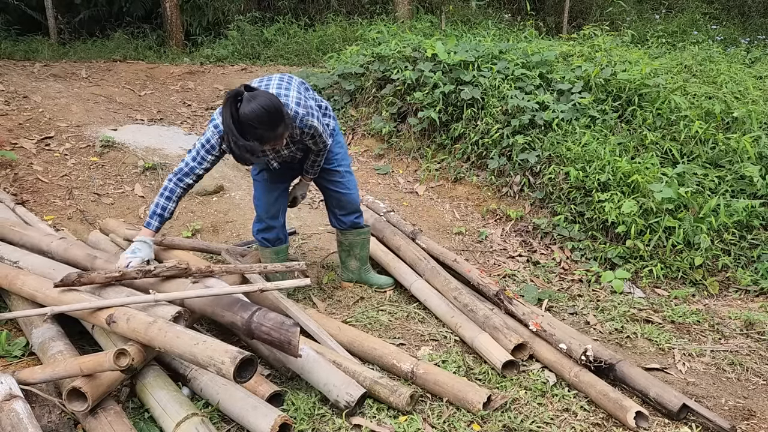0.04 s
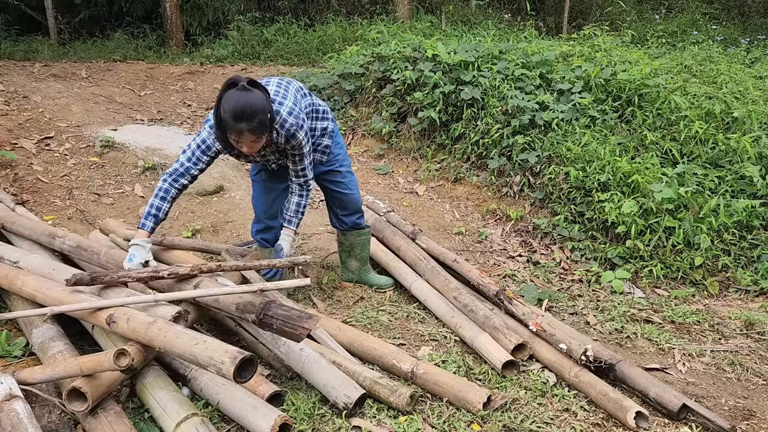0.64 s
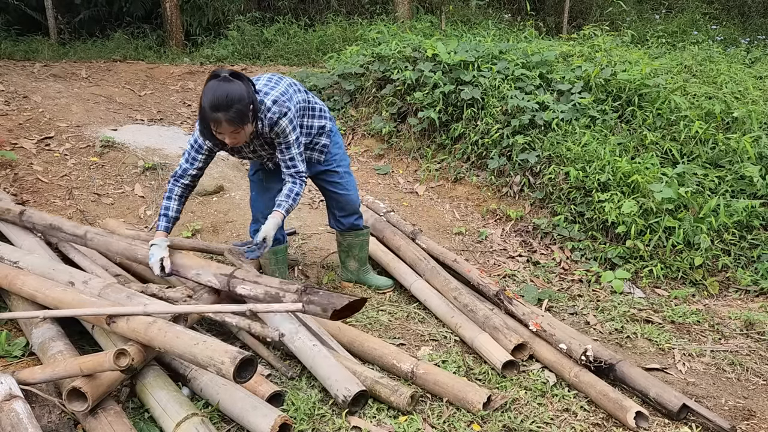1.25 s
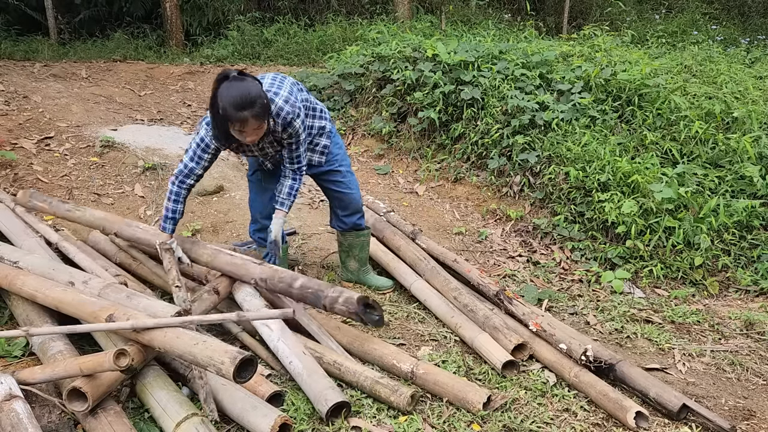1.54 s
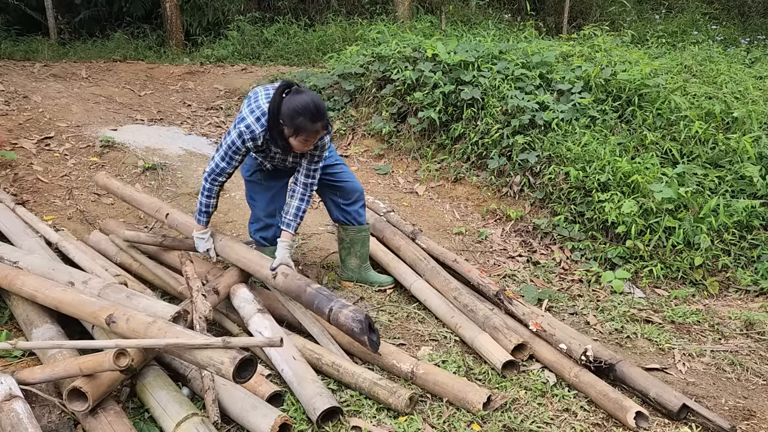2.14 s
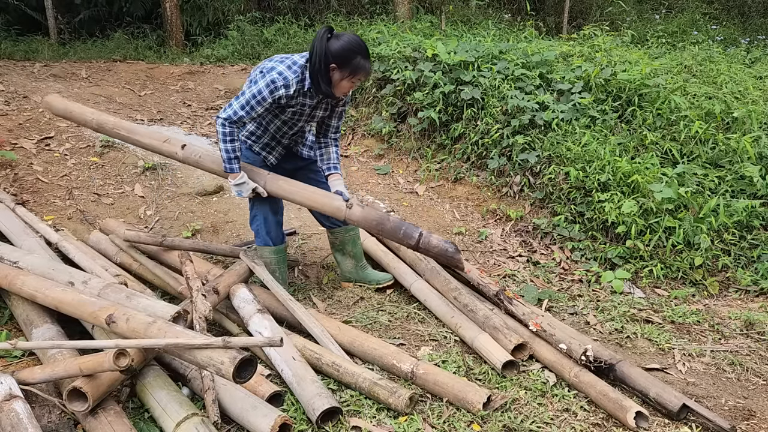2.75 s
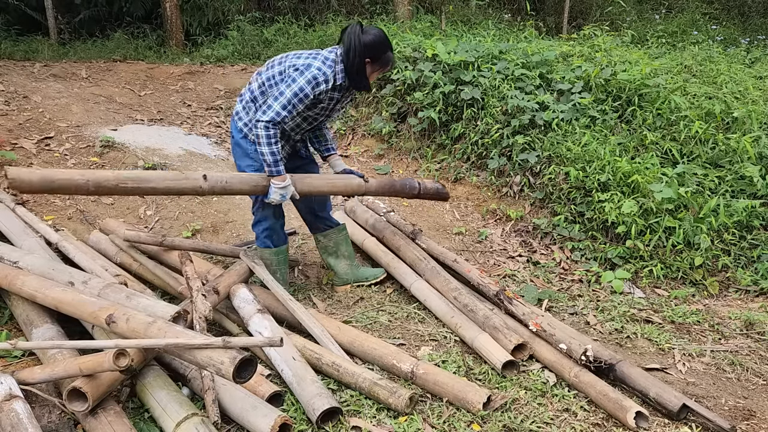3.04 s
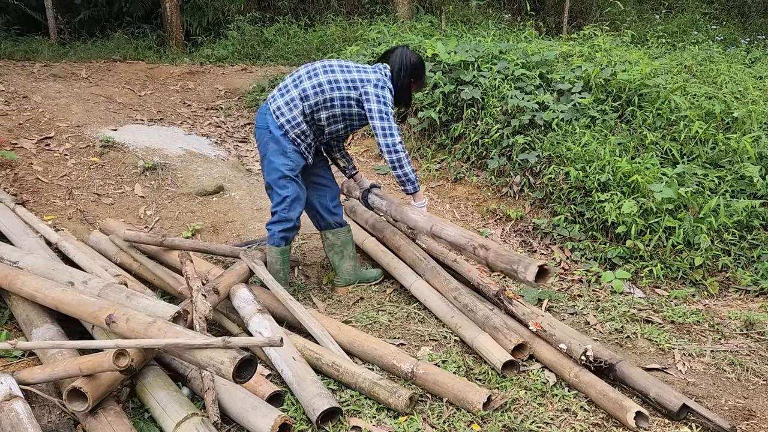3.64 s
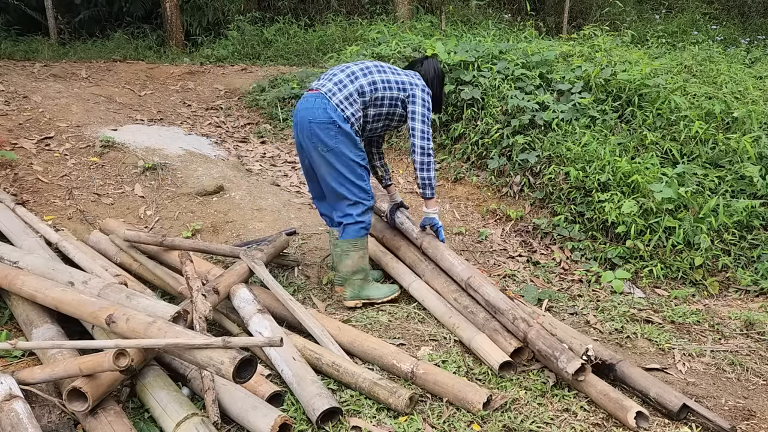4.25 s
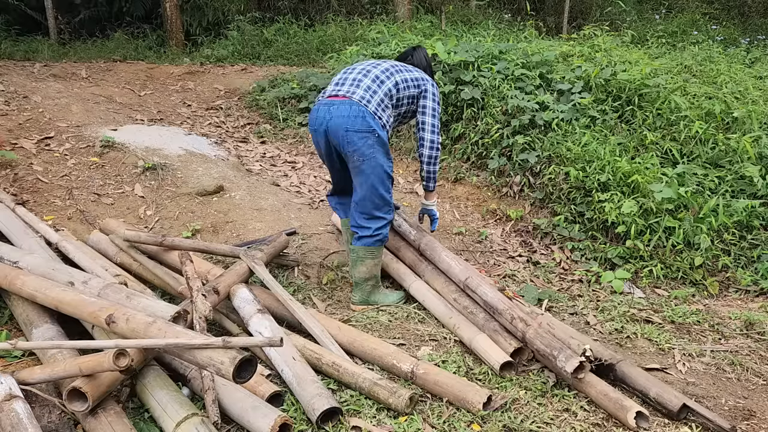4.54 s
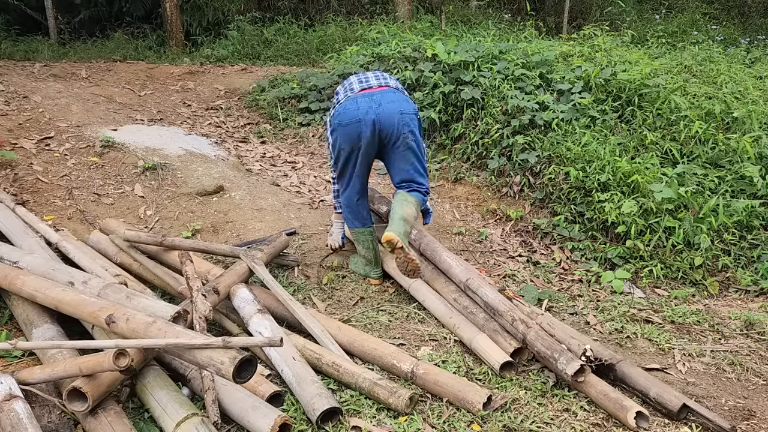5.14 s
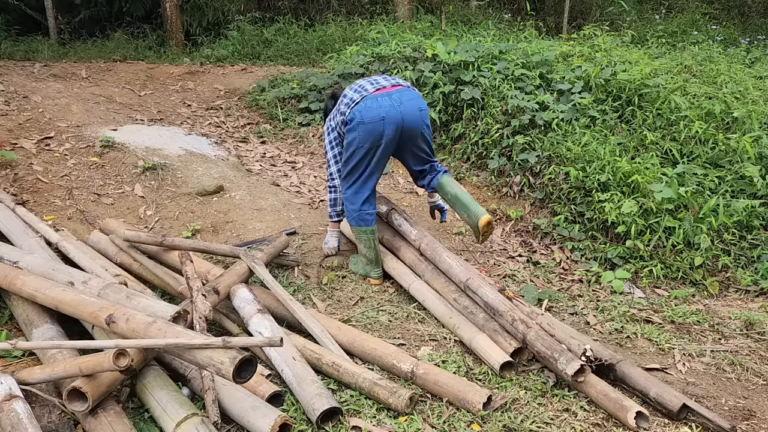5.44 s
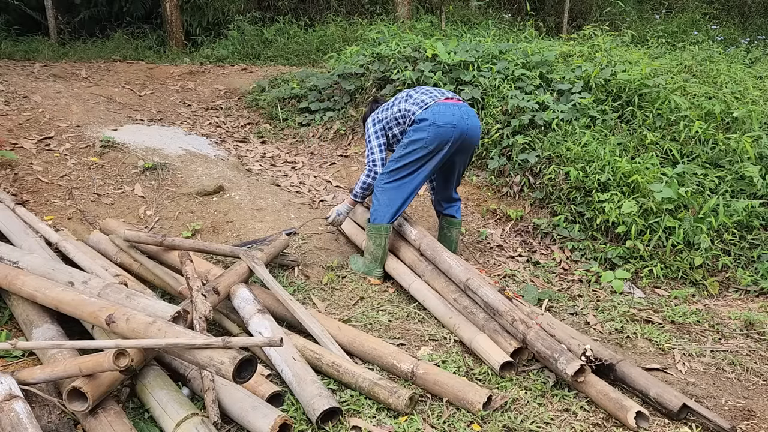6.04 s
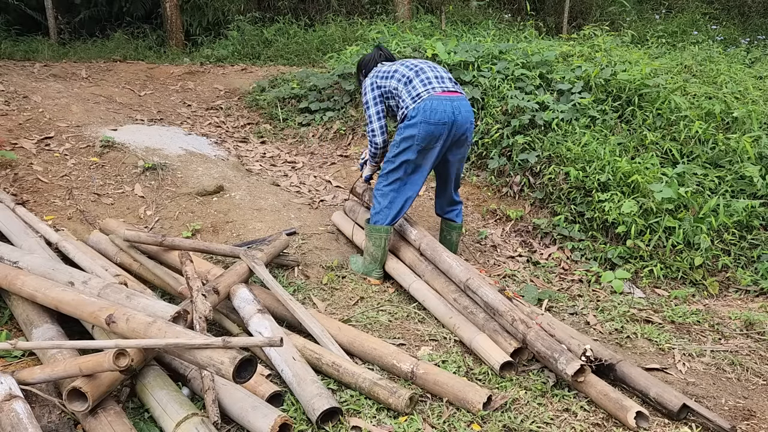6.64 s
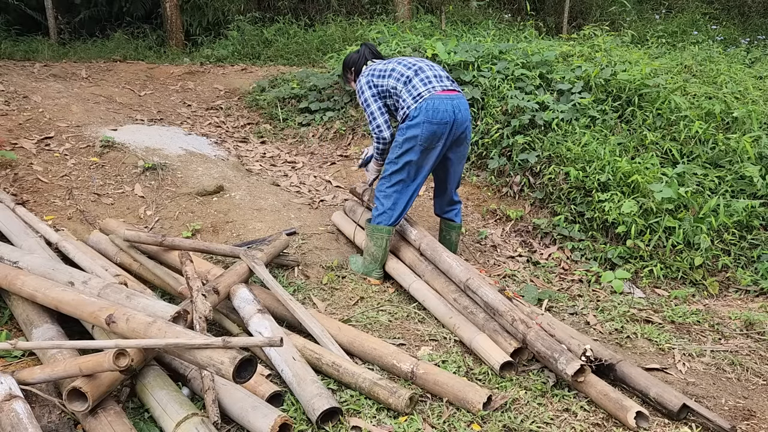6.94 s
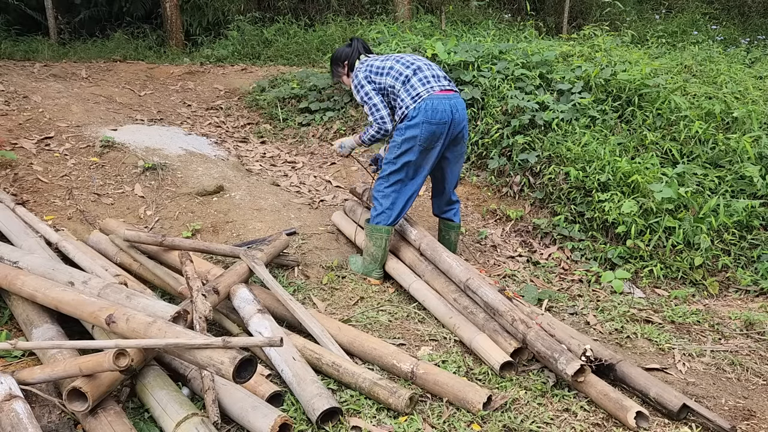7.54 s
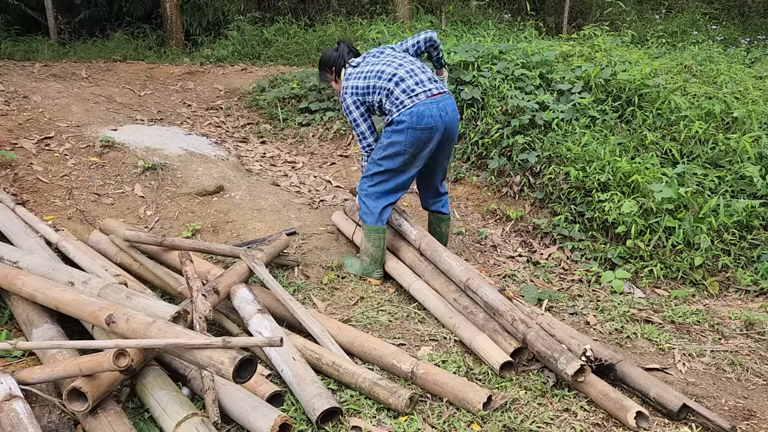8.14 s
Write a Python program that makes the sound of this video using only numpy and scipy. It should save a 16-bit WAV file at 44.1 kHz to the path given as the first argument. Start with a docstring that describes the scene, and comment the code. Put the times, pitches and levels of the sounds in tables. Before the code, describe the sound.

A light, hollow bamboo knock sounds at about 0.4 seconds, followed by a faint scrape. From 1 to 2.1 seconds a pole is dragged off the pile nearby: loud, dry clattering in three quick clusters, with rasping, tiny splinter cracks and low bumps on the ground. A lull follows, with dry leaves rustling, a soft boot step near 3.1 seconds and a very faint, high insect trill between 2 and 4 seconds. At 4.2 seconds the pole drops on another stack with a short, loud clatter and scrape. Boots thud softly and scuff through leaves around 4.7 and 5.7 seconds. Small clacks come between 6.1 and 6.8 seconds, the clearest at 6.5. Faint ticks, a light scrape and a last step fill 7.5 to 8.3 seconds, as a distant low engine hum gently swells and eases. Foliage hisses quietly throughout, with little echo in the open air.

```python
"""A dry bamboo pole is dragged off a clattering pile, carried over and dropped on a second stack.
Each knock bends a pole and rings its hollow tube; sliding poles rasp and judder, and splinters snap.
Rubber boots tread on earth and leaves, and the stack is nudged into place with small clacks and scrapes.
Behind it, outdoors, an insect shrills faintly, a far engine hums low and the foliage hisses."""
import sys
import numpy as np
from scipy import signal
from scipy.fft import rfft, irfft, next_fast_len
from scipy.io import wavfile
from scipy.ndimage import map_coordinates

SR = 44100
rng = np.random.default_rng(int(sys.argv[2]) if len(sys.argv) > 2 else 0)


def master(y):
    """Save y as 16-bit WAV."""
    cut = np.clip(np.atleast_2d(y).T, -1, 1)
    pcm = np.round(cut * 32767)  # scale
    wavfile.write(sys.argv[1], SR, pcm.astype(np.int16))


N = 365148
TIME = np.arange(N) / SR
HIT = TIME[:SR // 3]  # time axis of a one-shot


# pole on pole: t/s, relative level/dB, hardness/dB, bending f/Hz, main tube ring f/Hz
POLE_KNOCKS = [(0.277, -50, -9, 298, 833), (0.289, -48.5, -17.5, 254, 700), (0.404, -31.5, 3, 257, 545),
               (1.134, -47, -6, 228, 1000), (1.2199, -24.5, 6.5, 285, 563), (1.2504, -18.5, -3.5, 348, 513),
               (1.2559, -21.5, 9.5, 326, 570), (1.292, -23, -3.5, 357, 873), (1.305, -20.5, 5, 280, 550),
               (1.341, -41, -10, 298, 544), (1.412, -36, -3.5, 329, 515), (1.595, -47, 5, 300, 535),
               (1.672, -22.5, -2, 263, 648), (1.713, -18.5, 9, 275, 505), (1.73, -23.5, -3, 226, 480),
               (1.75, -25, 1.5, 340, 512), (1.801, -42.5, -9, 217, 570), (1.935, -39.5, 1, 257, 780),
               (1.953, -28, 5.5, 403, 890), (1.968, -18.5, 2, 350, 844), (2.009, -31, -3, 292, 720),
               (4.2322, -18.5, 1, 442, 490), (4.2556, -16, 2.5, 372, 620), (4.2641, -25, 8.5, 335, 562),
               (4.297, -24.5, 4.5, 370, 556), (4.3401, -35.5, -7, 212, 926), (4.363, -27, 2, 263, 562),
               (4.37, -24.5, 3, 288, 583), (6.131, -51, 2.5, 330, 795), (6.518, -35, 8, 354, 1036),
               (6.825, -51, 12, 295, 1013), (7.498, -62.5, 17, 196, 1096), (7.857, -54, 10.5, 385, 540),
               (7.929, -54, 11, 385, 855), (8.07, -55.5, 17, 420, 1094)]
# the pile's weight on the ground: t/s, f/Hz, relative level/dB
GROUND_BUMPS = [(1.306, 121, -33), (1.722, 83, -29), (1.765, 120, -34), (1.945, 127, -30), (1.978, 98, -30),
                (4.238, 100, -26), (4.267, 175.4, -26.5), (4.361, 107, -38)]
def knocks(rebound_s=0.014, trim_db=-0.27):
    """Poles strike and rebound, and the ground takes their weight with a low bump."""
    out = np.zeros(N)
    for s, db, hardness_db, bend_hz, ring_hz in POLE_KNOCKS:
        add(out, s, blow(db, hardness_db, bend_hz, ring_hz))
        bounce_s = s + rebound_s * rng.uniform(0.8, 1.2)
        # the rebound is quieter, softer and lower
        add(out, bounce_s, blow(db - 14, hardness_db - 4.5, bend_hz * 0.85, ring_hz))
    for s, hz, db in GROUND_BUMPS:
        add(out, s, from_db(db) * swing(hz, t60=0.19, rise_t60=0.011))
    return from_db(trim_db) * out


# the tube's clear modes: f/Hz, relative level/dB, t60/s
TUBE_MODES = [(491.5, 4, 0.034), (514, -9.5, .08), (561, -3.5, 0.13), (615, -12.5, .1), (745.6, -7, 0.12),
              (831, -6.5, 0.081), (950, -3, 0.079), (1047, 1, 0.058), (1075, -6.5, 0.018),
              (1350, -3.5, 0.072), (1446, 0, 0.078), (1485, 12.5, 0.026), (1650, -8, 0.046),
              (1850, -6, 0.026), (2075, -5, 0.075), (2230, -14, .06), (2561, -18, .05)]
def tube_ring(detune_spread=0.013):
    """The tube's modes ring out, varied because each pole and each striking spot differs."""
    hz, db, t60 = np.transpose(TUBE_MODES)[:, :, None]
    strength, detune = rng.standard_normal((2, len(TUBE_MODES), 1))
    sign = rng.choice([-1, 1], (len(TUBE_MODES), 1))
    partials = np.sin(2 * np.pi * hz * (1 + detune_spread * detune) * HIT)
    ring = np.sum(sign * from_db(db + 2 * strength) * fade(HIT, t60) * partials, axis=0)
    return ring * (1 - fade(HIT, 0.0067))


# the wall's many close, damped modes: f/Hz, relative level/dB
WALL_EQ = [(100, -11), (210, 1), (450, 6), (900, 0.5), (1550, -2.5), (1900, -15.5), (2600, -11.5),
           (3400, -24), (4500, -33), (8000, -45.5), (15000, -46.5)]
# body, hollow, clack, tick: low f/Hz, high f/Hz, noise t60/s, relative level/dB, hardness slope/(dB/dB)
KNOCK_LAYERS = [(127.7, 358, 0.13, 3, -1.0), (465, 1150, 0.042, 1.97, 0.0562),
                (1102, 3600, 0.017, -5.5, 1.01), (2604, 6000, 0.025, -16.5, 1.06)]
def blow(db, hardness_db, bend_hz, ring_hz):
    """One contact bends the pole and rings tube and wall; a harder one trades body for clack and tick."""
    tube = tube_ring()
    wall = colour(rng.standard_normal(len(HIT)), WALL_EQ) * (1 - fade(HIT, .009))
    thud, wall_hollow, wall_clack, tick = [
        unit_hit(band(wall * fade(HIT, t60), low, high)) for low, high, t60, *_ in KNOCK_LAYERS]
    tube_hollow, tube_clack = [unit_hit(band(tube, low, high)) for low, high, *_ in KNOCK_LAYERS[1:-1]]
    body = swing(bend_hz, t60=0.074, rise_t60=0.0077) + from_db(-0.5) * thud
    note = swing(ring_hz, t60=0.062, rise_t60=0.023)
    hollow = from_db(1) * note + tube_hollow + from_db(-1.5) * wall_hollow
    layers = [body, hollow, tube_clack + wall_clack, tick]
    return sum(from_db(db + layer_db + slope * hardness_db) * unit_hit(layer)
               for (*_, layer_db, slope), layer in zip(KNOCK_LAYERS, layers))


def nudge(s=6.677, hz=588, db=-45, t60=0.11):
    """A light nudge rings only the hollow of a tube: a soft note with neither thud nor clack."""
    out = np.zeros(N)
    hollow = unit_hit(band(rng.standard_normal(len(HIT)) * fade(HIT, t60), 466, 740))
    add(out, s, from_db(db) * unit_hit(swing(hz, t60, rise_t60=0.018) + hollow))
    return out


# splinters snapping: t/s, level/dB
SPLINTER_SNAPS = [(1.2223, -33), (1.411, -46.5), (1.7134, -47), (1.968, -48), (4.2553, -38.5),
                  (4.342, -31.5), (6.521, -46), (6.54, -40), (6.827, -51.5)]
# their bright tone: f/Hz, relative level/dB
SPLINTER_EQ = [(1000, -13), (2000, -2), (3500, 4.5), (6000, -8.5), (10000, -11), (15000, -18.5)]
def splinters(t60=0.0049):
    """Dry fibres let go in a very short, bright crack."""
    out = np.zeros(N)
    for s, db in SPLINTER_SNAPS:
        crack = colour(rng.standard_normal(len(HIT)), SPLINTER_EQ) * fade(HIT, t60)
        add(out, s, from_db(db) * unit_hit(crack))
    return out


# poles, and once a glove, sliding on poles: start t/s, length/s, judder level/dB, rasp level/dB
SLIDES = [(0.42, 0.43, -56, -59.5), (1.003, 0.34, -51, -44.5), (1.258, 0.41, -43, -51.5),
          (1.69, 0.443, -43.5, -72), (2.924, 0.24, -56, -66), (3.952, 0.4, -58.5, -57),
          (4.301, 0.17, -44, -54), (7.606, 0.666, -72, -54)]
# resonances of the scraped tube: f/Hz, relative level/dB
RASP_EQ = [(300, -12.5), (450, -6), (560, 2.5), (680, -8), (1030, -1.5), (1280, -2.5), (1470, -1),
           (1680, -7.5), (2300, -6), (3600, -9), (6000, -20), (12000, -29)]
def slides(squeal_hz=1480, squeal_db=-9, hollow_db=-9):
    """Tiny slips rasp in the tube and a squeal comes and goes, while the pole judders hollowly."""
    slips = grains(per_s=3000, spread_db=2.0)
    squeal = rms_one(band(slips, squeal_hz * .93, squeal_hz * 1.07) * from_db(4 * drift(16)))
    scrape = colour(slips, RASP_EQ) * from_db(2.6 * drift(45))
    rasp = rms_one(scrape + from_db(squeal_db) * squeal)
    catches = grains(per_s=330, spread_db=1.0)
    body, hollow = rms_one(band(catches, 150, 380)), rms_one(band(catches, 490, 620))
    judder = rms_one(body + from_db(hollow_db) * hollow)
    return sum(stroke(s, length_s, attack_s=0.15, release_s=0.12)
               * (from_db(judder_db) * judder + from_db(rasp_db) * rasp)
               for s, length_s, judder_db, rasp_db in SLIDES)


# boots on earth: t/s, thud f/Hz, thud level/dB, scuff level/dB
BOOT_STEPS = [(3.118, 201, -49, -56), (4.681, 270, -42.5, -62), (4.705, 201, -43.5, -67.5),
              (5.725, 235, -34, -43.5), (8.22, 225.7, -42, -74)]
# scuff of a rubber sole: f/Hz, relative level/dB
SOLE_EQ = [(200, -14), (500, -27), (900, 1), (1500, 2.5), (2200, -7), (4000, -12), (8000, -12.5),
           (15000, -34)]
def steps():
    """Boots land with a dull thud, and the sole scuffs the earth a moment later."""
    out = np.zeros(N)
    for s, hz, thud_db, scuff_db in BOOT_STEPS:
        earth, sole = rng.standard_normal((2, len(HIT)))
        soil = unit_hit(band(earth * fade(HIT, 0.088), 132, 257))
        thud = swing(hz, t60=0.027, rise_t60=.015) + from_db(3.5) * soil
        scuff = colour(sole, SOLE_EQ) * fade(HIT, 0.076) * (1 - fade(HIT, 0.024)) ** 2
        add(out, s, from_db(thud_db) * unit_hit(thud) + from_db(scuff_db) * unit_hit(scuff))
    return out


# boots, gloves and poles brush dry leaves: peak t/s, half length/s, relative crunch/dB, relative crisp/dB
LEAF_BRUSHES = [(0.802, 0.026, -50, -69), (1.137, 0.13, -50, -63), (1.278, 0.025, -51, -50),
                (1.593, 0.27, -55.5, -61.5), (2.012, 0.13, -54, -63), (3.059, 0.11, -53.5, -64.5),
                (4.18, 0.12, -53, -62), (4.263, 0.024, -50, -49.5), (4.455, 0.033, -57, -61),
                (4.67, 0.098, -57, -67), (4.78, 0.031, -51.5, -62), (5.062, 0.064, -57.5, -68),
                (5.22, 0.042, -68, -66), (6.14, 0.062, -59, -69.5), (6.31, 0.031, -49, -53.5)]
# upper-mid crunch of the leaves: f/Hz, relative level/dB
CRUNCH_EQ = [(400, -4.5), (1500, 3.5), (3000, 1), (5000, 0), (7000, -13.5), (10000, -22), (15000, -27.5)]
def rustle(knocking, shake_db=-27, settle_s=0.02):
    """Each brush or knock stirs the leaves into a cloud of tiny crackles, with a few stalks snapping."""
    # knocks shake the leaves in proportion to their strength
    hold = np.exp(-1 / (settle_s * SR))
    shake = signal.lfilter([1 - hold], [1, -hold], np.abs(knocking) + 1e-18)
    crunch_gain, crisp_gain = from_db(shake_db) * shake, np.zeros(N)
    for s, half_s, crunch_db, crisp_db in LEAF_BRUSHES:
        swell = np.exp(-((TIME - s) / half_s) ** 2)
        crunch_gain += from_db(crunch_db) * swell
        crisp_gain += from_db(crisp_db) * swell
    leaves = np.array([grains(per_s=5200, spread_db=2) for ear in range(2)]) * from_db(1.2 * drift(70))
    snap = rng.standard_normal((2, len(HIT))) * fade(HIT, 0.0037)
    stalks = rms_one(signal.fftconvolve(grains(per_s=34, spread_db=2.0)[None], snap, axes=1)[:, :N])
    crackle = rms_one(leaves + .52 * stalks)
    crunch, crisp = colour(crackle, CRUNCH_EQ), rms_one(band(crackle, 5000, 14000))
    return from_db(-3.0) * crunch_gain * crunch + from_db(0.9) * crisp_gain * crisp


# where the poles touch: t/s, left ear lead/ms, left minus right level/dB
PAN_PATH = [(0, 0.094, 1.5), (2.2, 0.18, 0), (4.2, 0.12, 0.3), (8.198, -.02, 1)]
def place(x):
    """The nearer ear hears the work sooner and louder."""
    s, lead_ms, pan_db = np.transpose(PAN_PATH)
    half_lead = np.interp(TIME, s, lead_ms) * SR / 2000
    half_pan_db = np.interp(TIME, s, pan_db) / 2
    return np.array([map_coordinates(x, [np.arange(N) + side * half_lead], order=3)
                     * from_db(side * half_pan_db) for side in (1, -1)])


def clearing(x, scatter_db=-9.5, scatter_t60=0.054, tail_db=-13, tail_t60=0.39):
    """Nearby poles and ground scatter the sound at once; bank and trees return a faint, dull tail."""
    t = TIME[:SR]
    scatter_decay, tail_decay = fade(t, scatter_t60), fade(t, tail_t60)
    scatter = band(diffuse(len(t)), 870, 15000) * scatter_decay * (t > .001)
    tail = band(diffuse(len(t)), 150, 2520) * tail_decay * (1 - fade(t, 0.36))
    response = (from_db(scatter_db) * scatter / np.linalg.norm(scatter_decay)
                + from_db(tail_db) * tail / np.linalg.norm(tail_decay))
    return signal.fftconvolve(x[None], response, axes=1)[:, :N]


# the insect's bursts: start t/s, length/s, level/dB
INSECT_TRILLS = [(2.069, 0.42, -72.5), (2.89, 0.34, -61), (3.42, 0.63, -72.5)]
def insect(flutter_db=2.5):
    """A thin, very high, fluttering trill from the bushes."""
    gain = sum(from_db(db) * stroke(s, length_s, attack_s=0.14, release_s=0.13)
               for s, length_s, db in INSECT_TRILLS)
    shrill = band(rng.standard_normal((2, N)), 11750, 12650)
    return gain * rms_one(shrill * from_db(flutter_db * drift(40)))


def engine(hz=96, waver=0.028, flutter_db=3.0, peak_db=-52, peak_s=7.45, half_power_s=0.85):
    """A far engine: one wavering firing tone in a narrow rumble, slowly swelling and receding."""
    firing_hz = hz * (1 + waver * drift(13))
    tone = np.sin(2 * np.pi * np.cumsum(firing_hz) / SR) * from_db(flutter_db * drift(12))
    rumble = rms_one(band(rng.standard_normal(N), 84, 108))
    swell = from_db(peak_db) / np.hypot(1, (TIME - peak_s) / half_power_s)
    return swell * rms_one(tone + 0.1 * rumble)


# outdoor bed: f/Hz, relative level/dB
AIR_EQ = [(15, -32.5), (24, -1.5), (31, -13.5), (50, -3.5), (80, -5.5), (110, -11.5), (140, -19.5),
          (200, -24.5), (300, -28.5), (470, -30.5), (600, -24.5), (800, -27), (1200, -26.5), (2300, -24.5),
          (3800, -30.5), (5100, -27.5), (6500, -33.5), (8000, -32), (11000, -40.5), (13000, -43.5),
          (15800, -43)]
def air(db=-54):
    """Foliage hisses steadily all around, over a low rumble."""
    return from_db(db) * colour(diffuse(N), AIR_EQ)


# stereo image of diffuse sound: f/Hz, left-right correlation
EAR_LIKENESS = [(60, 1), (130, 0.93), (290, 0.83), (640, 0.16), (1400, -.35), (3000, 0.15), (15000, -0.19)]
def diffuse(size):
    """Stereo noise from all around: alike in the bass, wide in the treble."""
    padded = next_fast_len(size)
    alike = np.clip(at_hz(EAR_LIKENESS, np.fft.rfftfreq(padded, 1 / SR)), -1, 1)
    mid, side = rfft(rng.standard_normal((2, padded)))
    return irfft(np.sqrt(1 + alike) * mid + np.sqrt(1 - alike) * side * [[1], [-1]], padded)[:, :size]


def swing(hz, t60, rise_t60):
    """One mode that swells during the contact and dies away."""
    return unit_hit(np.sin(2 * np.pi * hz * HIT) * fade(HIT, t60) * (1 - fade(HIT, rise_t60)))


def grains(per_s, spread_db):
    """Random clicks of uneven size."""
    sizes = from_db(spread_db * np.minimum(rng.exponential(1, N), 4)) * rng.choice([-1, 1], N)
    return rms_one(sizes * (rng.random(N) < per_s / SR))


def stroke(start_s, length_s, attack_s, release_s):
    """Rise, hold and fall of one gesture."""
    return np.clip(np.minimum((TIME - start_s) / attack_s, (start_s + length_s - TIME) / release_s), 0, 1)


def drift(per_s):
    """Random modulation with a spread near 1."""
    return np.interp(TIME * per_s, np.arange(2000), rng.standard_normal(2000))


def fade(t, t60):
    """Exponential decay, 60 dB down at t60."""
    return np.exp(-np.log(1000) * t / t60)


def band(x, low_hz, high_hz):
    """Causal band-pass."""
    sos = signal.butter(2, [low_hz, min(high_hz, .45 * SR)], "band", fs=SR, output="sos")
    return signal.sosfilt(sos, x)


def colour(x, eq):
    """Shape a noise with an EQ curve; rms 1."""
    size = next_fast_len(x.shape[-1])
    gain = from_db(at_hz(eq, np.fft.rfftfreq(size, 1 / SR)))
    return rms_one(irfft(rfft(x, size) * gain, size)[..., :x.shape[-1]])


def at_hz(points, hz):
    """Read a curve on a log-frequency axis."""
    points = np.array(points)
    return np.interp(np.log(hz + 1e-3), np.log(points[:, 0]), points[:, 1])


def from_db(db):
    """Decibels to gain."""
    return 10 ** (np.asarray(db) / 20)


def rms_one(x):
    """Scale to unit rms."""
    return x / np.sqrt(np.mean(x ** 2) + 1e-20)


def unit_hit(x):
    """Scale to the energy of 10 ms at unit rms."""
    return x / np.sqrt(np.sum(x ** 2) / (SR / 100) + 1e-20)


def add(out, s, sound):
    """Mix a sound in at time s."""
    start = max(round(s * SR), 0)
    out[start:start + len(sound)] += sound[:N - start]


def scene():
    """Poles and boots in the clearing, over the outdoor background."""
    knocking = knocks()
    work = knocking + nudge() + splinters() + steps() + slides()
    return place(work) + clearing(work) + rustle(knocking) + insect() + engine() + air()


def record(dry, cutoff_hz=15900):
    """A steep high cut on the whole mix."""
    return signal.sosfilt(signal.ellip(10, .1, 80, cutoff_hz, fs=SR, output="sos"), dry)


dry = scene()
out = record(dry)
master(out)
```